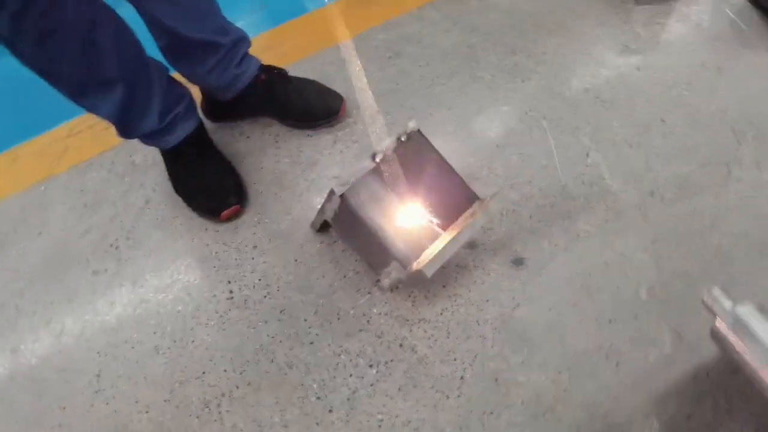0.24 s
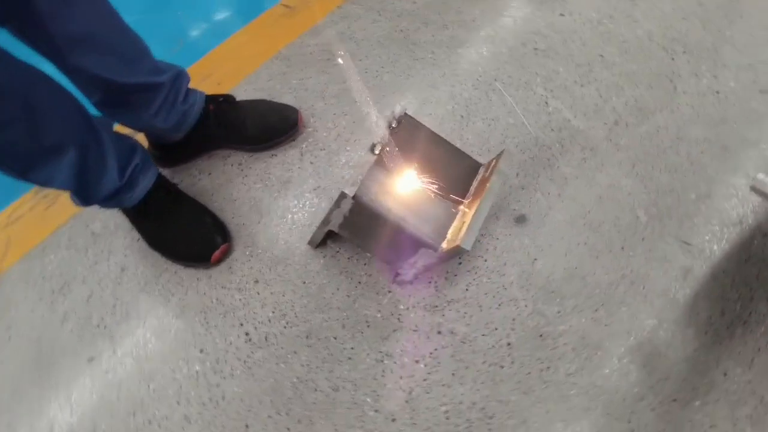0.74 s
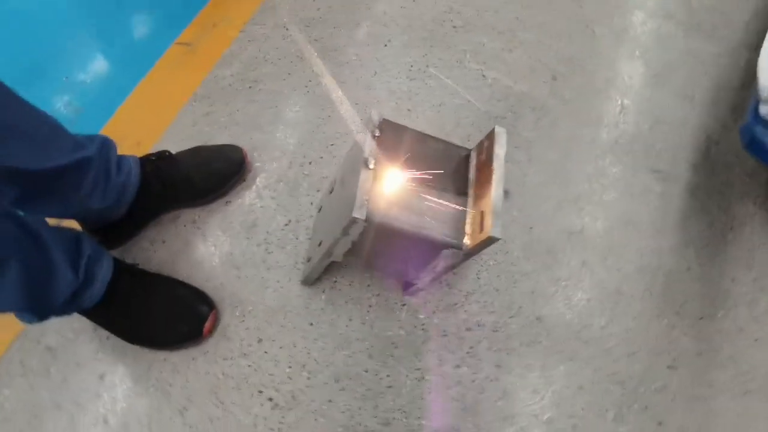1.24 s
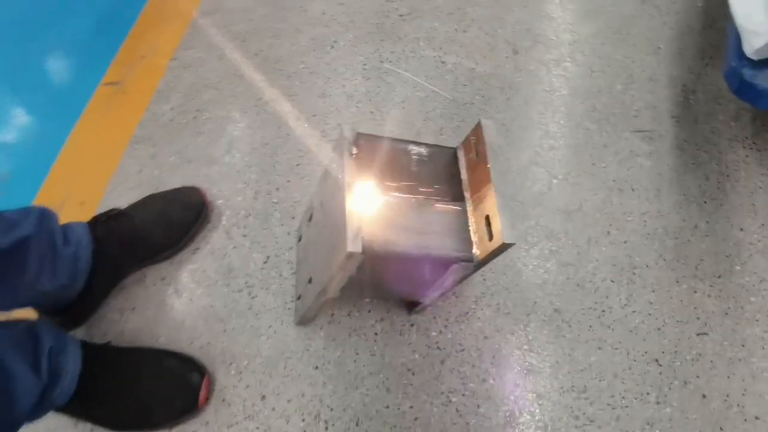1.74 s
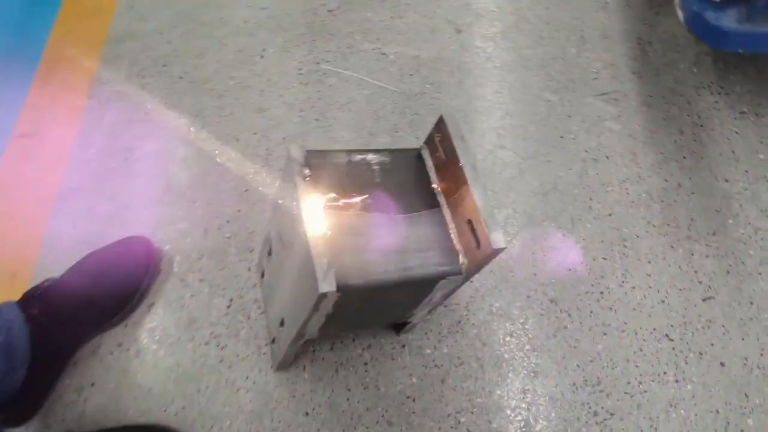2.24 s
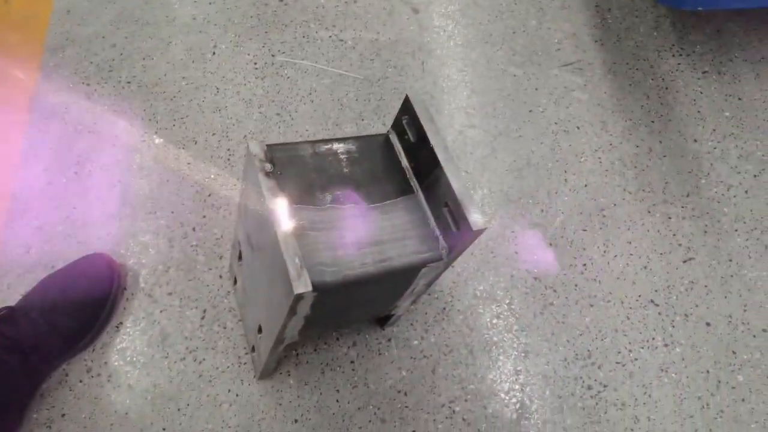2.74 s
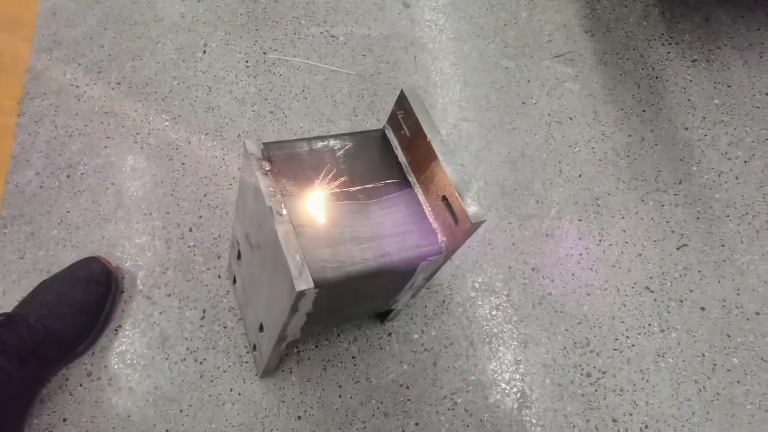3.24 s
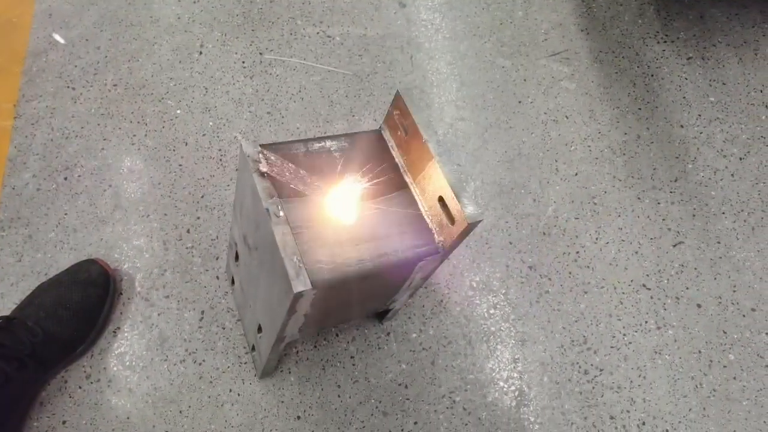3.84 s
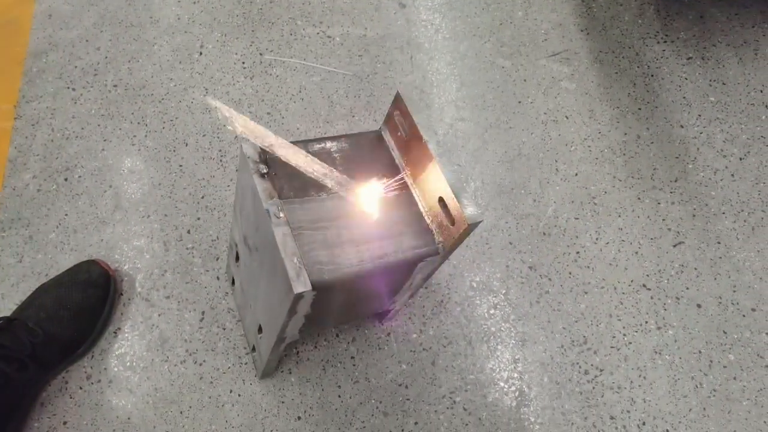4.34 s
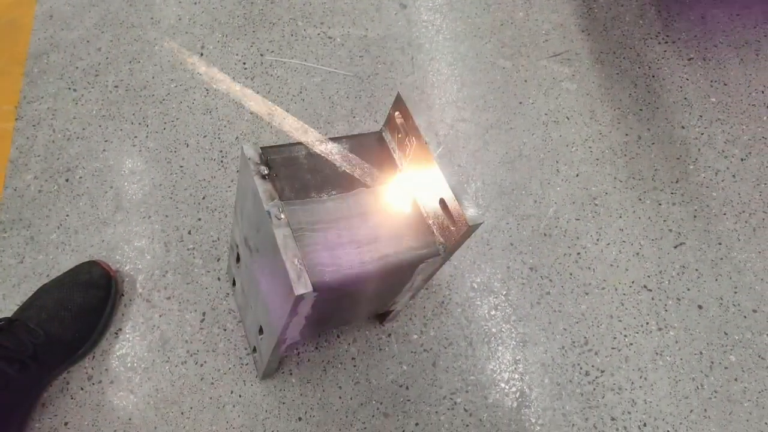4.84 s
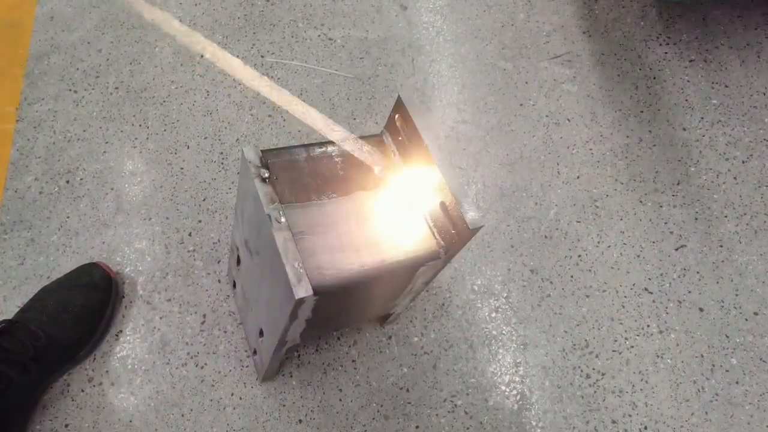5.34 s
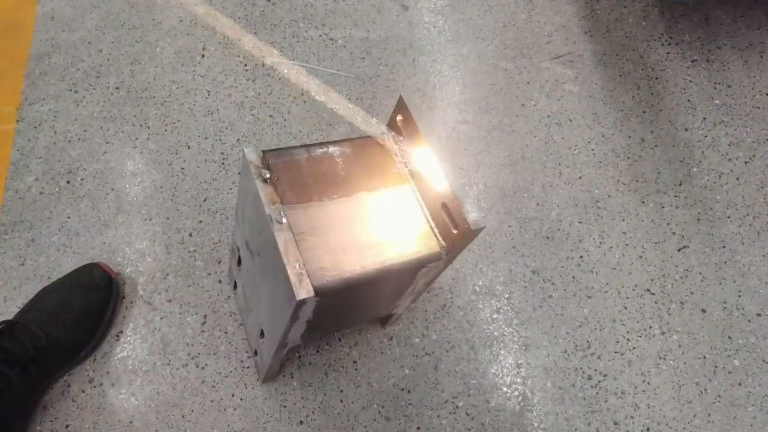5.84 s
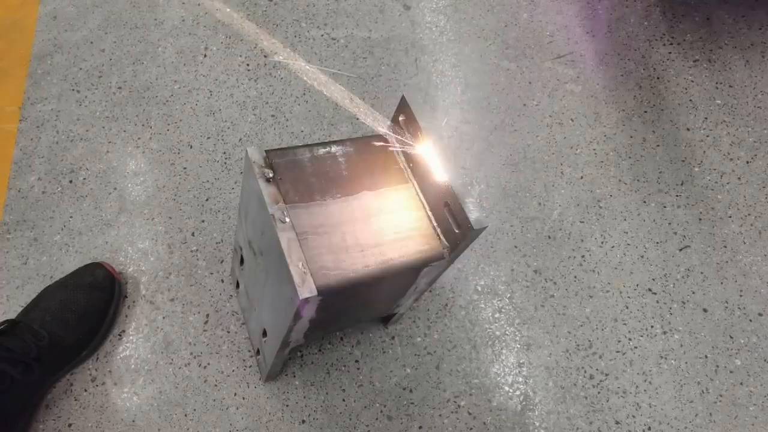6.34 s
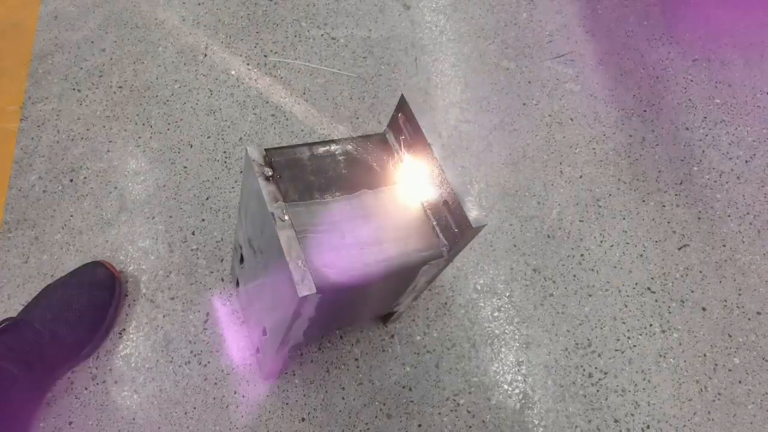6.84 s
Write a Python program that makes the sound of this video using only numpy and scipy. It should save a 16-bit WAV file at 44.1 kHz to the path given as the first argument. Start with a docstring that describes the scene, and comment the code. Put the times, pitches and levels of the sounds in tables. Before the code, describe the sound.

From 0 s a loud, steady, high-pitched jet of air hisses close by, airy and piercing, strongest in the upper mids and treble with little bass. It never stops. Over the first 2.4 s the phone turns, so the hiss reaches the right side progressively later and its hollow colouring shifts; floor and nearby reflections give it a slightly phasey edge. Very faint underneath is a raspy low buzz, about 130 pulses a second, with soft crackle. It weakens, almost vanishing from 2 to 2.9 s, returns around 3 s, and is strongest between 3.9 and 5 s in uneven surges with gaps. It then flickers, sometimes thinner and brighter, drops out briefly near 6.2 s, and comes back until the end at 7.1 s. Quiet machine hum and low rumble waver throughout, dipping briefly at 6.2 s too. Stereo phone microphones, hard-floored workshop.

```python
"""A handheld laser strips rust from a steel part on a workshop floor, heard at a phone's two ports.
From the start a gun's air jet hisses over a hum and rumble, while the mirror-swept beam buzzes faintly on rust.
The phone turns, so the hiss reaches the right port later and later until 2.4 s; the buzz fades near 2 s.
It comes back around 3 s and is strongest from about 3.9 to 5 s, with gaps; near 6.2 s buzz and hum dip briefly.
The jet and rumble are shaped noise, the buzz is a sum of harmonics with noise crackle, the hum is sines."""
import sys
import numpy as np
from scipy import signal
from scipy.fft import rfft, irfft, next_fast_len
from scipy.io import wavfile
from scipy.ndimage import uniform_filter1d, map_coordinates

SR = 44100
rng = np.random.default_rng(int(sys.argv[2]) if len(sys.argv) > 2 else 0)


def put_to_file(sound):
    """Save the sound as 16-bit audio at rate SR, in the file named by the first command-line argument."""
    columns = np.atleast_2d(sound).T  # one column per channel
    safe = np.clip(columns, -1, 1)
    whole_steps = np.round(safe * 32767)
    wavfile.write(sys.argv[1], SR, whole_steps.astype(np.int16))


N = 312228  # samples

# how much later the jet's straight path reaches the right port: t/s, lag/ms
PORT_LAG = [(0, 0.197), (1.3, 0.261), (1.7, 0.31), (1.9, 0.362), (2.1, 0.397), (2.4, 0.436), (3, 0.422),
            (4.4, 0.408), (7.08, 0.406)]


def amp(db):
    """Turn dB into gain."""
    return 10 ** (np.asarray(db) / 20)


def unit(x):
    """Scale x to rms 1."""
    return x / np.sqrt(np.mean(x ** 2) + 1e-20)


def columns(rows, at, scale=lambda v: v):
    """Interpolate every column after the first at the given places."""
    first, *cols = np.transpose(rows)
    return [np.interp(scale(at), scale(first), col) for col in cols]


def along(rows, hz):
    """Interpolate columns on a log frequency axis."""
    return columns(rows, hz, np.log1p)


def wobble(rate):
    """A smooth random curve with rate knots a second."""
    knots = rng.standard_normal(int(N * rate / SR) + 4)
    return map_coordinates(knots, [np.arange(N) * rate / SR])


def filtered(x, response):
    """Filter x by multiplying its spectrum with a response of frequency."""
    size = next_fast_len(N + 8192)
    spectrum = rfft(x, size) * response(np.fft.rfftfreq(size, 1 / SR))
    return irfft(spectrum, size)[..., :N]


def jet():
    """Turbulent air hiss: a straight path, floor bounce and nearby echoes, plus unrelated wall sound at each port."""
    # level and tone: t/s, level/dB, left minus right/dB, low end boost/dB, treble boost/dB
    jet_moves = [(0.0, -12, 0, 0, 1), (0.67, -13.5, -1.5, 0.5, 3.5), (1.32, -12.5, 0, 2, 2.5),
                 (1.77, -13.5, 0, 3.5, 4), (1.79, -14.5, 0.5, 0.5, 1), (1.87, -13, 0.5, 1, 4.5),
                 (2.33, -11, 0, -1.5, -1.5), (3.88, -12, 0, 1.5, 1.5), (4.4, -12.5, 0.5, 2.5, 1),
                 (6.33, -13, -0.5, 3, 2.5), (7.08, -13.5, 1, 4, 1)]
    # the phone turns through three poses: t/s, pose/0-2
    phone_turn = [(0, 0.042), (1.2, 0.19), (1.7, 0.54), (2.3, 0.98), (3.2, 1.1), (4.2, 1.35), (5, 1.7),
                  (7.08, 1.7)]
    # bounce off the floor: t/s, delay/ms, strength/dB
    floor_bounce = [(0, 3, -17), (.6, 2.7, -1.5), (1.3, 2.7, -4), (2.2, 2.85, -5), (3.7, 2.86, -7.5),
                    (5.5, 3.12, -6.5), (7.08, 2.8, -11)]
    # colour at the left port: f/Hz, first pose/dB, second pose/dB, third pose/dB
    left_colour = [(970, -28, -33, -26), (1260, -26.5, -25, -23.5), (1530, -25, -26.5, -20),
                   (1760, -21.5, -16, -16.5), (1940, -12, -13.5, -12.5), (2277, -12.5, -2, -5.5),
                   (2410, -7.5, -11.5, -10), (2650, -10.5, -6.5, -8), (3070, -9, -10, -12),
                   (3390, -13, -6.5, -7.5), (3770, -11, -16, -15), (3910, -13.5, -14, -11),
                   (4630, -10.5, -8.5, -8), (6300, -2.5, -4, -4), (7190, 1, 1.5, 1.5), (8600, 1, -3, -1.5),
                   (8910, -9, -8.5, -8.5), (11830, -20.5, -20, -12.5), (13760, -19.5, -15.5, -15.5),
                   (15900, -28, -25, -22)]
    # colour at the right port: f/Hz, first pose/dB, second pose/dB, third pose/dB
    right_colour = [(940, -42, -33.5, -27), (1290, -23.5, -30, -29), (1640, -28, -20, -19.5),
                    (1840, -21, -18, -29), (2000, -13, -12, -9), (2220, -13, -8.5, -7),
                    (2330, -9, -10.5, -7.5), (2720, -8.5, -11, -5), (2960, -14.5, -10.5, -13),
                    (3360, -18, -6.5, -9.5), (3380, -21, -14, -12), (3840, -12, -9.5, -12),
                    (4520, -12.5, -12, -10), (5720, 0, 1.5, 1.5), (7830, -2, -2, -2),
                    (8230, -3.5, -5.5, -14), (8750, -10, -13.5, -20), (9700, -17.5, -15, -12),
                    (10300, -23, -16, -17), (10750, -23, -20, -25), (11200, -25, -19, -20),
                    (11800, -27, -21, -16), (12400, -23.5, -16.5, -15.5), (13300, -28, -19, -18),
                    (14000, -32, -22, -32), (14700, -41, -30, -48)]
    # phase shift of the right port's duct: f/Hz, first pose/rad, second pose/rad, third pose/rad
    duct_phase = [(700, -1.5, -1.5, 2), (1180, -0.3, -0.6, -0.8), (1570, 0.4, -0.43, -0.07),
                  (1870, 0.7, -1.3, 0), (1990, 0.6, -0.1, -0.16), (2240, -0.86, 0.1, -0.5),
                  (2650, 0.1, -0.4, 0.3), (3070, -0.8, -0.28, -0.6), (3630, 0.1, -0.87, -0.3),
                  (4410, 1, -2, 0.7), (4980, -3, -2, -2), (5530, -5.5, -2.5, -4.5), (6990, -7.5, -6.5, -8),
                  (7830, -6.5, -7.5, -8), (9200, -7, -5, -5), (10100, -5.5, -5.5, -7.5),
                  (11350, -6, -5.5, -3), (12700, -5.2, -6.5, -6), (13800, -6.3, -8, -6)]
    # power share of the noise common to both ports: f/Hz, first pose/0-1, second pose/0-1, third pose/0-1
    direct_share = [(700, 0.7, 1, 0.8), (1100, 0.65, 0.99, 0.95), (1520, 1, 1, 1), (1810, 0.54, 0.93, 0.6),
                    (1990, 1, 0.78, 0.76), (2320, 1, 0.76, 0.77), (2440, 0.36, 0.82, 1),
                    (2720, 0.66, 0.9, 0.8), (3300, 0.35, 0.98, 0.76), (3600, 0.44, 0.75, 0.65),
                    (4380, 0.55, 0.9, 0.55), (5200, 0.9, 0.7, 0.3), (5470, 0.98, 1, 0.6),
                    (7250, 0.5, 1, 0.85), (8240, 0.72, 1, 0.34), (9300, 0.4, 0.5, 0.8),
                    (10000, 0.5, 1, 0.7), (10600, 0.45, 0.95, 0.15), (11500, 0.4, 0.9, 0.9),
                    (12500, 0.5, 0.95, 0.87), (13800, 0.3, 0.62, 0.47), (14800, 0.1, 0.1, 0.1)]
    frame = dict(fs=SR, nperseg=1024, noverlap=768)

    flutter = amp(0.19 * wobble(11) + 0.3 * wobble(22.12))
    noise = flutter * rng.standard_normal((3, N))
    hz, t, (straight, *walls) = signal.stft(noise, **frame)
    f = hz[:, None]
    # soft random patches of level across time and frequency
    patches = uniform_filter1d(rng.standard_normal(straight.shape), size=10, axis=0)
    patches = uniform_filter1d(patches, size=12, axis=1)

    level_db, pan_db, low_db, top_db = columns(jet_moves, t)
    lag_ms, = columns(PORT_LAG, t)
    pose, = columns(phone_turn, t)
    bounce_ms, bounce_db = columns(floor_bounce, t)
    drift = np.interp(t * SR, np.arange(N), wobble(1.24))  # the hand never holds quite still
    # crossfade between neighbouring poses
    weights = np.clip(1 - np.abs(np.clip(pose, 0, 2) - np.arange(3)[:, None]), 0, 1)

    def posed(trio):
        """Blend three pose curves into one map over frequency and time."""
        return np.transpose(trio) @ weights

    def late(ms):
        """A delay as a phase turn that grows with frequency."""
        return np.exp(-2j * np.pi * f * ms / 1000)

    long_wave = 1 / (1 + (f / 3800) ** 4)  # near 1 for long waves, which bend round small things
    treble = 1 / (1 + (9500 / (f + 1)) ** 8)

    def nearby():
        """Legs, feet and the steel part scatter five weak copies, weakest in the bass, drifting as the phone turns."""
        echo_gain = amp(-12.5 - 15.5 * long_wave - 6 * treble)
        stretch = 1 + 0.0502 * pose + 0.011 * drift
        return sum(echo_gain * late(ms * stretch) for ms in rng.uniform(0.81, 4, size=5))

    share = np.clip(posed(along(direct_share, hz)), 0, 1)
    edges_db = low_db / (1 + (f / 3200) ** 4) + top_db * treble
    nozzle_db = -30 / (1 + (f / 700) ** 4)  # a small nozzle makes little bass
    gain = amp(level_db - level_db.mean() + edges_db + nozzle_db + 0.96 * unit(patches))

    to_left = 1 + amp(bounce_db) * late(bounce_ms) + nearby()
    # at the right port the floor bounce is weaker, most of all in the treble
    right_bounce = amp(bounce_db - 2.5 * (2.0 - long_wave)) * late(bounce_ms - 0.04)
    to_right = 1 + right_bounce + nearby()
    to_right = to_right * late(lag_ms) * np.exp(1j * posed(columns(duct_phase, hz)))

    ports = []
    for path, wall, colour, side in zip((to_left, to_right), walls, (left_colour, right_colour), (0.5, -0.5)):
        mix = np.sqrt(share) * path * straight + np.sqrt(1 - share) * wall
        colour_db = posed(along(colour, hz)) + side * pan_db
        ports.append(gain * amp(colour_db) * mix)
    hiss = signal.istft(np.array(ports), **frame)[1][:, :N]
    return amp(level_db.mean()) * unit(hiss)


def burn():
    """Each mirror pass flashes off a line of rust: a harmonic buzz and a puff of crackle, later at the right port."""
    # burning, strong on thick rust, weak on bare steel: t/s, strength/dB, brightness/dB per octave
    rust = [(0, -52, 2.5), (0.2, -59, 2.5), (0.6, -53.5, 0), (1.3, -63, 5.5), (1.85, -53.5, -4.5),
            (1.95, -69, 6), (2.85, -73, 5), (2.95, -56, -3.5), (3.55, -58.5, -0.5), (3.88, -51.5, -1.5),
            (4.25, -54, 2), (4.38, -60, 2), (4.44, -47, -1.5), (4.62, -50.5, -2), (4.72, -48, -5.5),
            (4.99, -47, -4.5), (5.04, -55, 9), (5.1, -54, 8), (5.14, -59, 7), (5.2, -58, 5),
            (5.27, -53.5, 2), (5.68, -50.5, 0), (5.85, -54.5, -2), (6.0, -60, 7), (6.13, -49, -1),
            (6.17, -75, 0.3), (6.24, -76, 2), (6.29, -54, 2), (6.7, -49.5, -1), (6.86, -54, 4.5),
            (6.92, -56, 8), (7.0, -52, 2), (7.08, -53, 2)]
    # overtones of the sweep: multiple, level over the strength/dB
    overtones = [(2, -16.5), (3, -4.5), (4, -3.5), (5, -6.5), (6, -4), (7, -5.5), (8, -7.5), (9, -6.5),
                 (10, -3.5), (11, -4.5), (12, -13), (13, -11), (14, 3)]
    # burning on the beam's way back, a second flash halfway: t/s, its strength over the first/0-1
    return_flash = [(0, 0), (3.75, 0.25), (3.85, .4), (3.95, 0), (4.98, 0.04), (5.03, 0.5), (5.15, 0.4),
                    (5.22, 0.16), (5.88, 0), (5.97, .5), (6.08, 0.14), (6.5, 0.2), (6.62, 0.3), (6.75, 0.1),
                    (6.88, 0.2), (7.0, 0.2), (7.08, .2)]
    # colour of the crackle before its level is set: f/Hz, level/dB
    crackle_colour = [(150, -38), (350, -3.5), (800, 3.5), (1500, 6), (2500, -24), (4000, -40)]
    # the buzz's lowest tone, once a pass: t/s, rms level before its wobble/dB
    throb_level = [(0.0, -53), (0.57, -53), (1.79, -74), (2.82, -75), (2.86, -79), (2.92, -62), (3.63, -61),
                   (3.9, -52), (4.02, -65), (4.18, -50), (4.34, -62), (4.47, -50), (4.99, -52.5),
                   (5.05, -74), (5.24, -59), (5.7, -52), (5.94, -58), (6.11, -53), (6.19, -78), (6.25, -68),
                   (6.74, -50), (6.94, -62), (7.0, -47), (7.08, -57)]
    sweep_hz = 129.82  # mirror passes a second
    pivot = 4  # the multiple that brightness leaves alone
    flicker_db, flicker_per_s = 2, 9.9  # the rust is uneven under the moving beam
    crackle_db, crackle_growth = -55, 0.74  # dB at mean strength; dB per dB of strength

    t = np.arange(N) / SR
    strength_db, bright_db = columns(rust, t)
    strength_db = strength_db + flicker_db * wobble(flicker_per_s)
    turn = sweep_hz * (t - 5.079)  # whole numbers where the beam meets the rust
    back = np.clip(columns(return_flash, t)[0], 0, 1)

    # overtones nearly in step: one short flash a pass, its shape drifting with the rust
    buzz = 0
    for k, db in overtones:
        # a narrow strip of rust gives a shorter, brighter flash
        tone_db = strength_db + bright_db * np.log2(k / pivot)
        level = amp(db + tone_db + 2.0 * wobble(4))
        two_flashes = 1 + back * np.cos(np.pi * k)  # they add on even multiples and cancel on odd ones
        buzz = buzz + level * two_flashes * np.cos(2 * np.pi * (k * turn + 0.11 * wobble(4)))
    throb = np.sqrt(2) * amp(columns(throb_level, t)[0] + 1.3 * wobble(5.4)) * np.cos(2 * np.pi * turn)
    buzz = buzz + throb

    once_a_pass = (1 - back) * np.cos(2 * np.pi * turn)
    twice_a_pass = back * np.cos(4 * np.pi * turn)
    puffs = np.exp(0.59 * (once_a_pass + twice_a_pass)) * rng.standard_normal((3, N))
    # one noise common to both ports, plus one of its own at each
    crackle = filtered(puffs[0] + 1.1 * puffs[1:], lambda hz: amp(along(crackle_colour, hz)[0]))
    crackle_gain = amp(crackle_db + crackle_growth * (strength_db - strength_db.mean()))
    left, right = buzz + crackle_gain * unit(crackle)

    lag_s = 0.5 * columns(PORT_LAG, t)[0] / 1000  # half the jet's lag
    return np.array([left, map_coordinates(right, [(t - lag_s) * SR], mode="nearest")])


def workshop():
    """Wavering hum of machines as sines over a low noise rumble, nearly the same at both ports in the bass."""
    # hum tones: f/Hz, peak level before wobble and swell/dB
    hum_tones = [(99.8, -55.5), (199.6, -66), (227, -61.5), (299.4, -71.5)]
    # colour of the rumble before its level is set: f/Hz, level/dB
    rumble_colour = [(20, -19), (45, -17), (70, -1.5), (150, 0.5), (400, -1), (900, -2.5), (1600, -58),
                     (3000, -43)]
    # how alike the rumble is at both ports: f/Hz, left-right likeness/0-1
    likeness = [(30, 0.95), (120, 1), (300, 0.98), (700, 0.72), (1500, 0.083)]
    # hum and rumble swell together: t/s, level/dB
    swell = [(0, 2.5), (0.7, 1.5), (1.5, 1), (3, -0.5), (4.2, 0.5), (5.2, -1), (6.12, 0.5), (6.2, -5),
             (6.3, -0.5), (7.08, 0)]

    t = np.arange(N) / SR
    skew = np.array([[0.018], [-0.018]])  # cycles: standing waves reach the ports a little out of step
    hum = 0
    for hz, db in hum_tones:
        level = amp(db + 2.0 * wobble(8))
        hum = hum + level * np.sin(2 * np.pi * (hz * t + skew + rng.random()))

    def mid_side(hz):
        """Split the rumble's colour into mid and side so the ports match as much as the likeness says."""
        spread = np.arccos(np.clip(along(likeness, hz)[0], -1, 1)) / 2
        return amp(along(rumble_colour, hz)[0]) * [np.cos(spread), np.sin(spread)]

    mid, side = filtered(rng.standard_normal((2, N)), mid_side)
    rumble = amp(-54.0 + 0.65 * wobble(1.55)) * unit(np.array([mid + side, mid - side]))
    return amp(columns(swell, t)[0]) * (hum + rumble)


def scene():
    """Sum all sources at the two ports."""
    return jet() + burn() + workshop()


def record(dry):
    """Round off the highest peaks and cut the treble steeply at the band limit."""
    top_hz = 15865
    rounded = dry / (1 + np.abs(dry / 1.1) ** 12) ** (1 / 12)

    def band_limit(hz):
        """Fall by 0.4 dB per Hz over the last 125 Hz, then to nothing."""
        return (hz < top_hz) * amp(-0.4 * np.maximum(hz - top_hz + 125, 0))

    return filtered(rounded, band_limit)


dry = scene()
out = record(dry)
put_to_file(out)
```